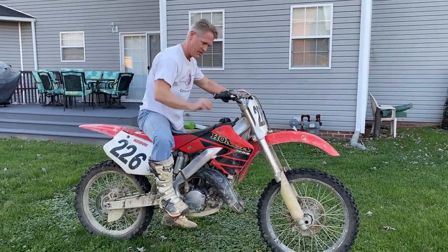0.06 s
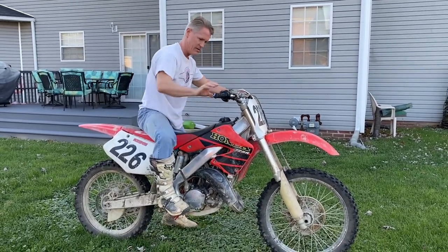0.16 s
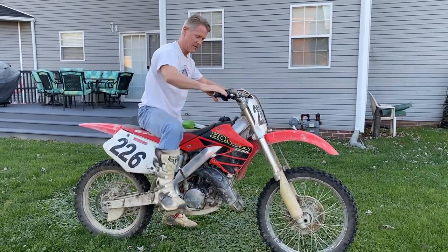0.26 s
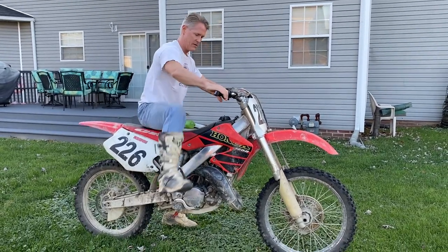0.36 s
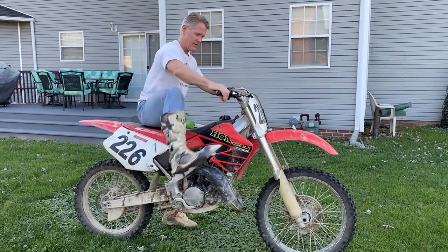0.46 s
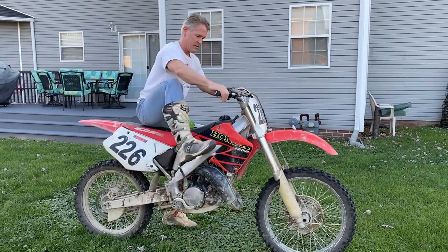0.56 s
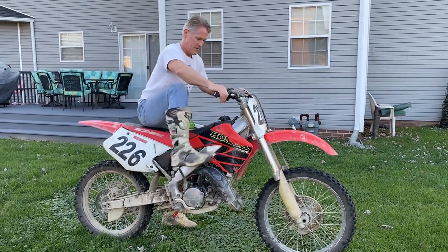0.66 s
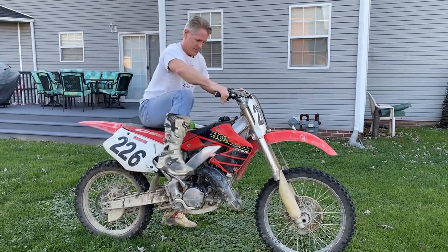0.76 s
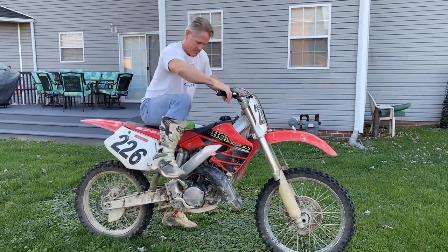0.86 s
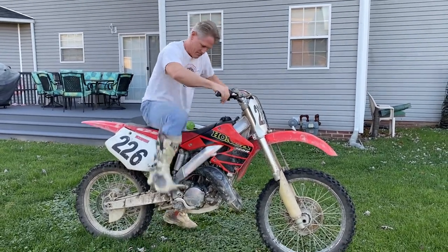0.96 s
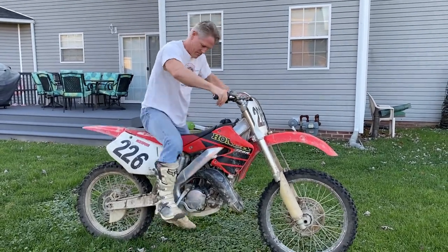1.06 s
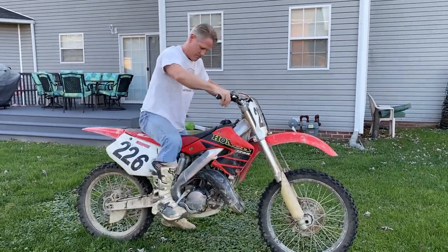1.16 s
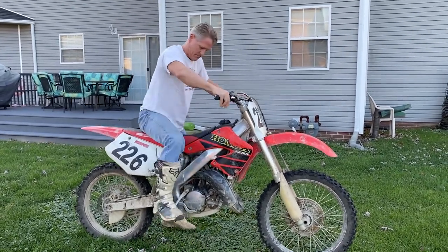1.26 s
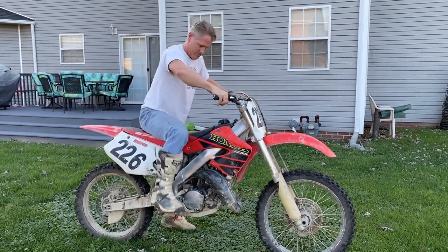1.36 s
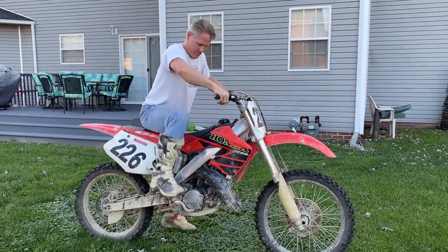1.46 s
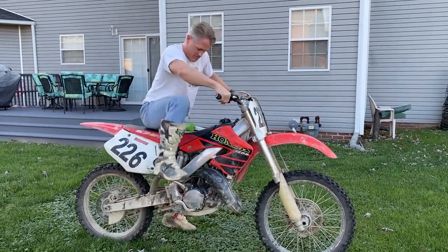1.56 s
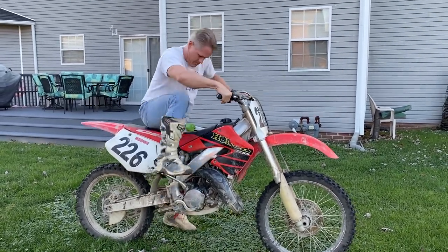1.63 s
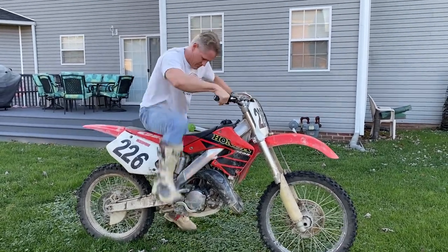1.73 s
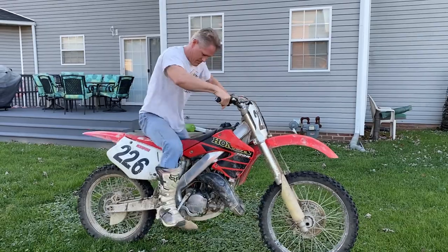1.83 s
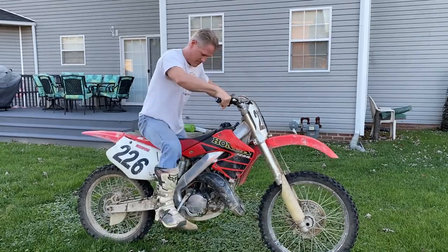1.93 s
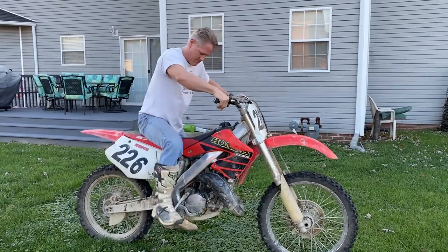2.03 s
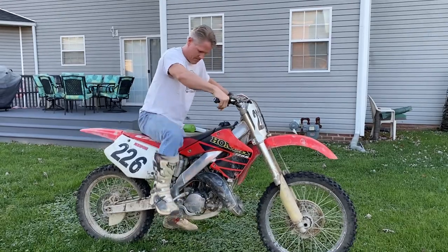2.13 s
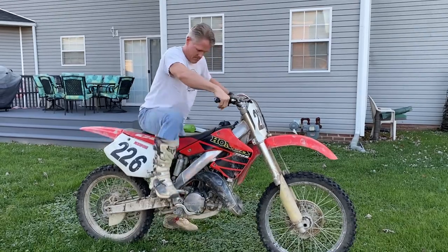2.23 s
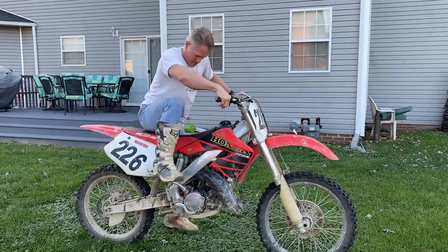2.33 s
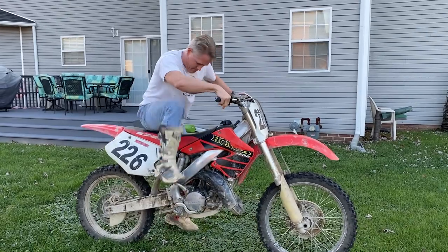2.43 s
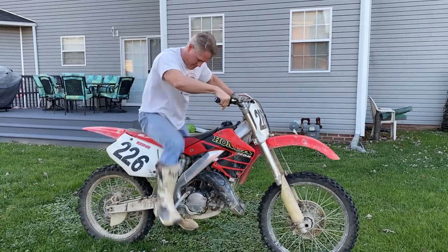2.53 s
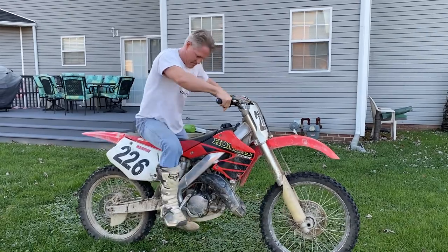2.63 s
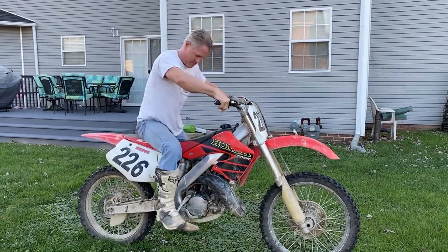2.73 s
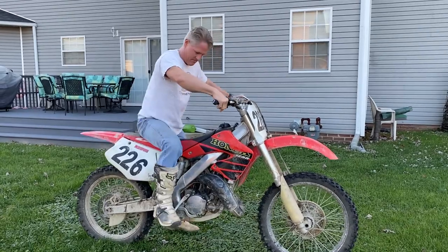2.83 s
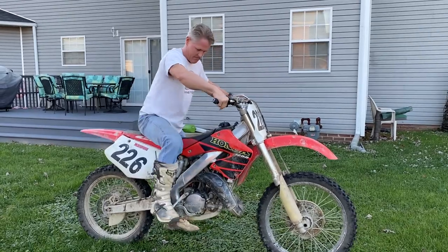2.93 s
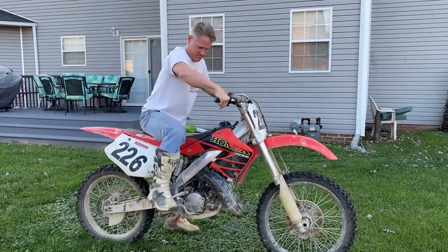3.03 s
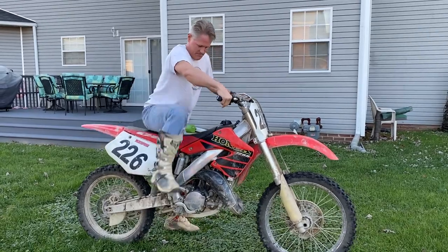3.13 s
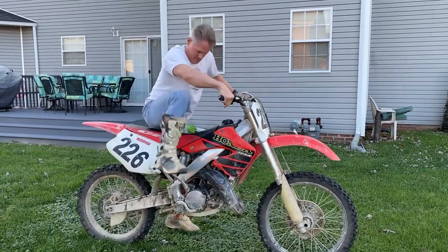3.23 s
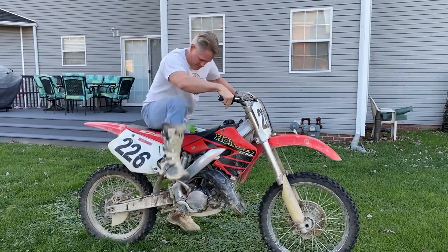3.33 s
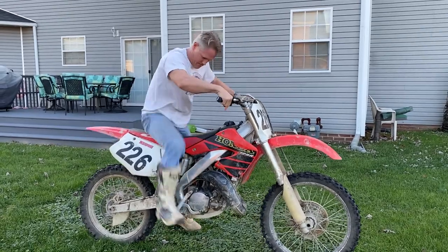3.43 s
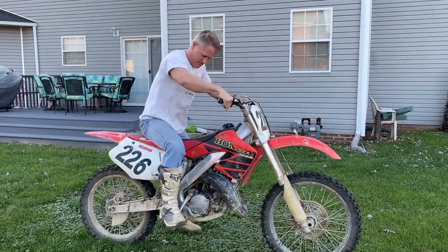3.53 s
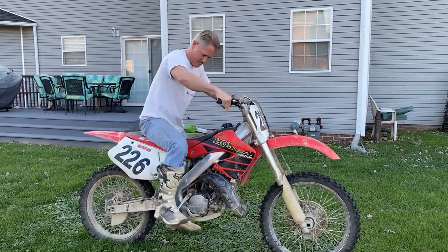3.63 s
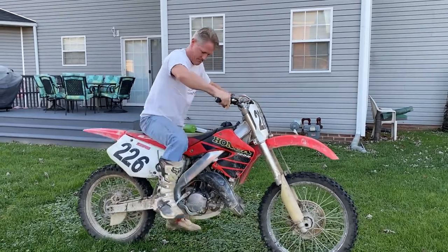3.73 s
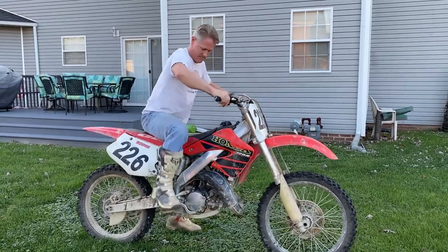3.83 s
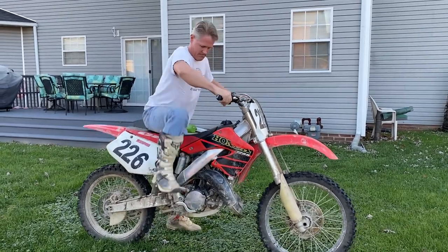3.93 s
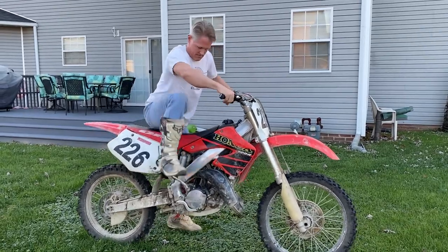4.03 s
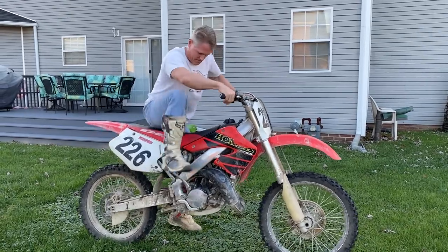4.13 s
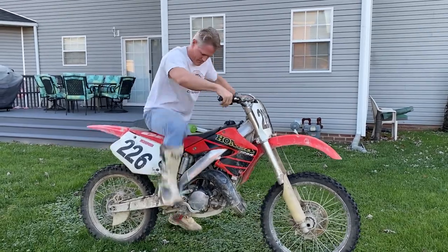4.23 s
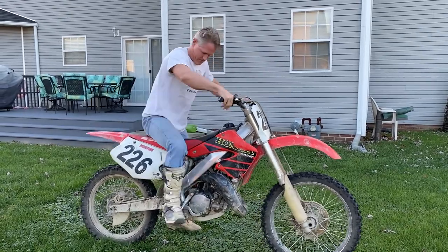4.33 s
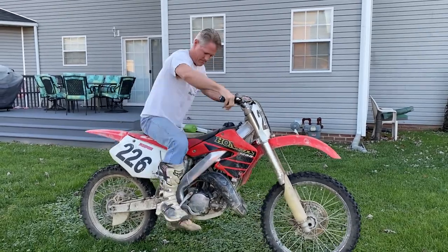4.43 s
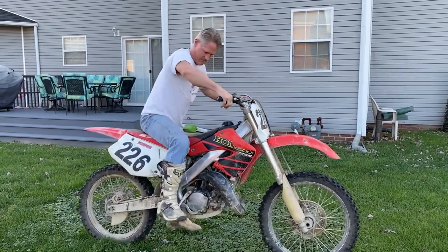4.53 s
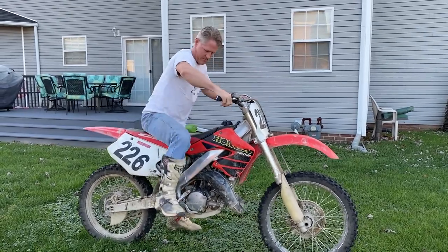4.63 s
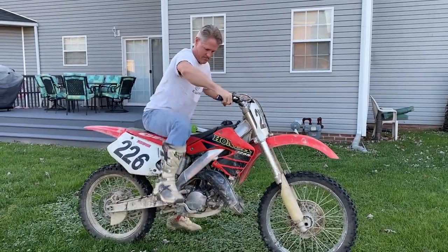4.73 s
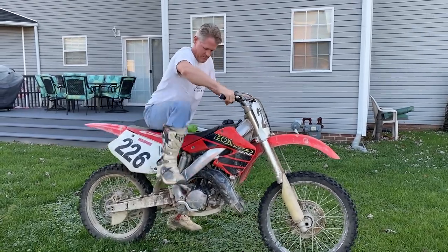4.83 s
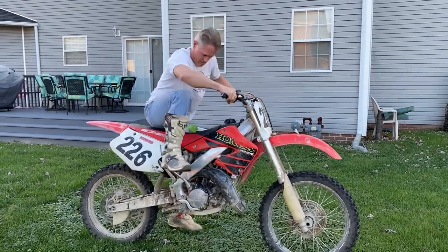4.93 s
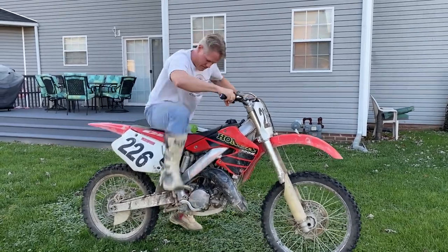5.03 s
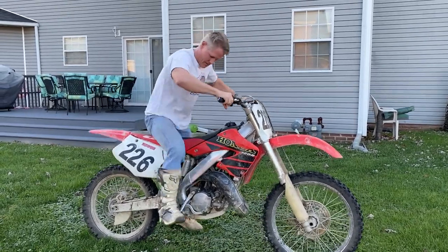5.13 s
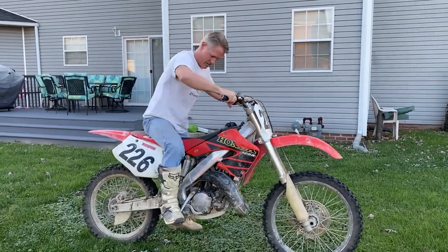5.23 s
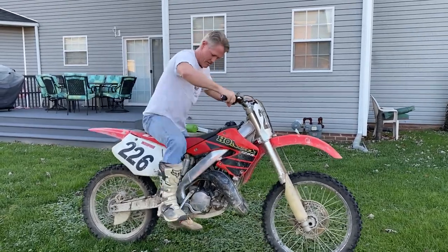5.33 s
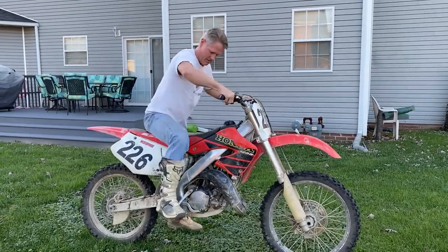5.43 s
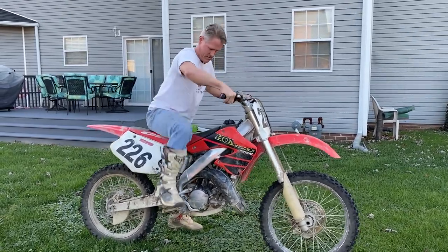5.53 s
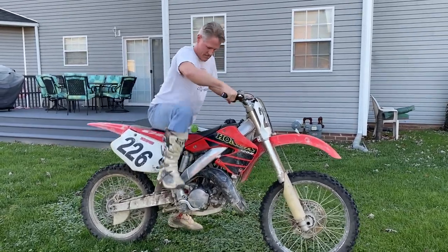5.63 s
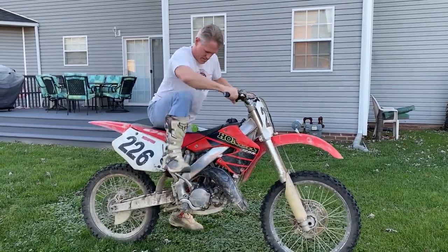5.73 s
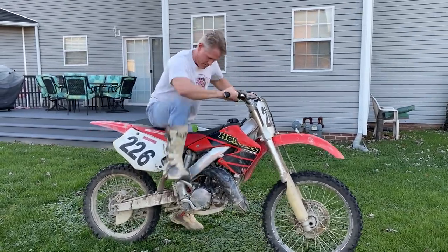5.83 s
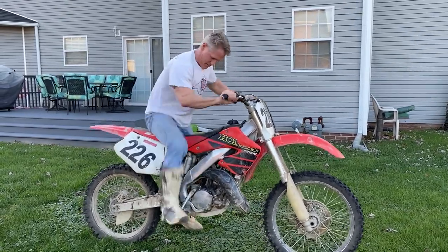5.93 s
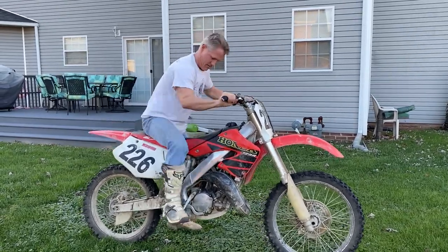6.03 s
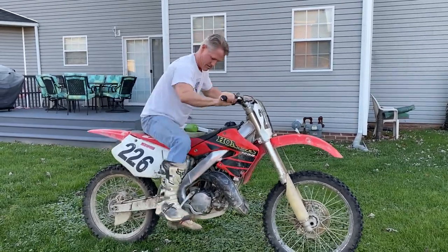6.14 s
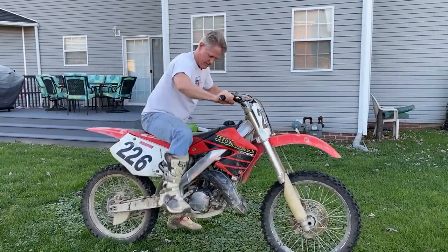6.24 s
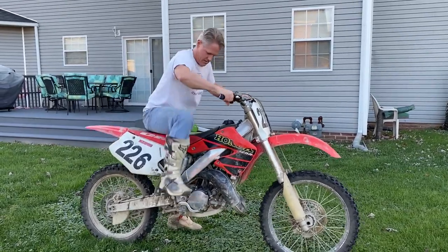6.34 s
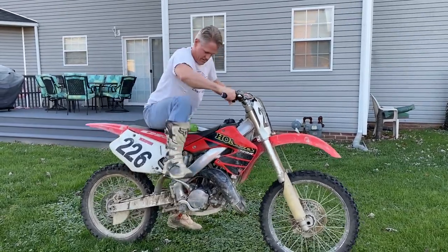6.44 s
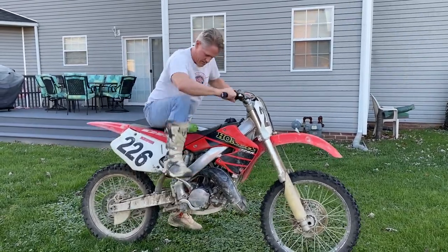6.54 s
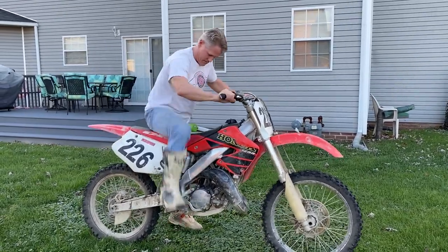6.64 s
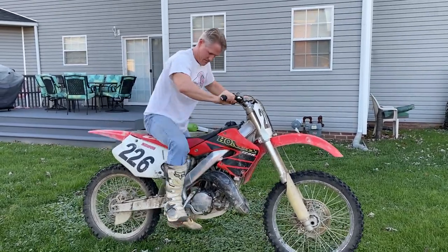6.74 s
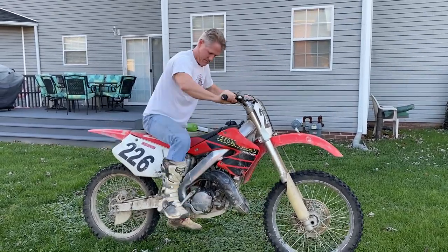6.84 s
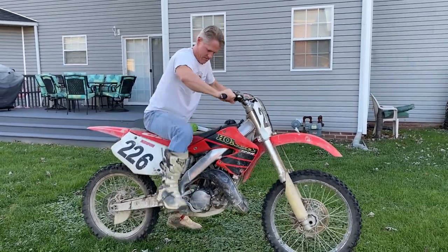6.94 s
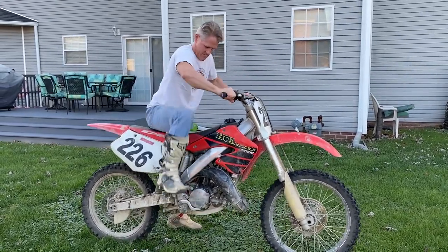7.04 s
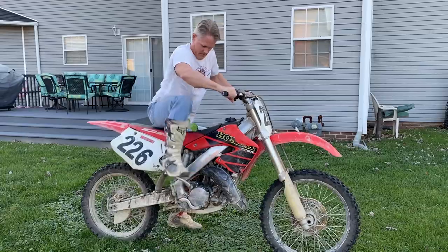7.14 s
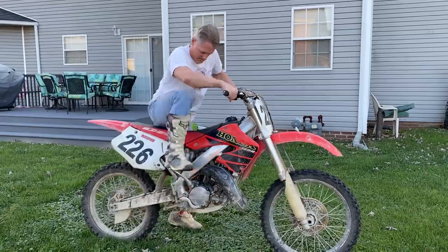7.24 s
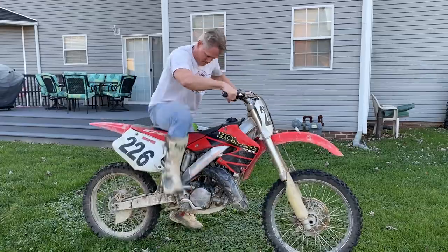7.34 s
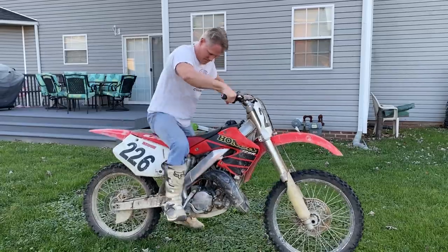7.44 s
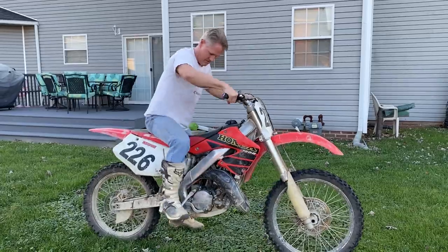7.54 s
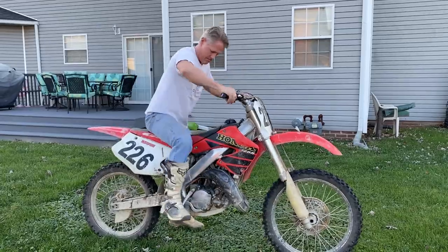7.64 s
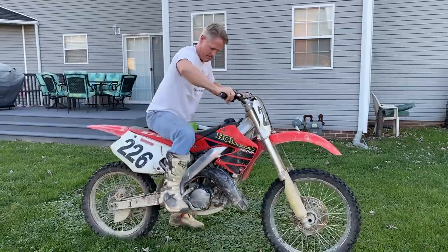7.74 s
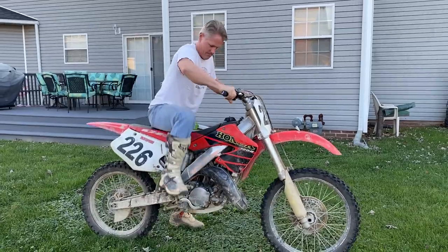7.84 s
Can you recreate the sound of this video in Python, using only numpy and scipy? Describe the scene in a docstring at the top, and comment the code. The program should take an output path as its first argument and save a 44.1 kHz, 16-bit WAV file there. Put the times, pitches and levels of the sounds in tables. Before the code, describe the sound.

Repeated metallic kickstarter slams with gear whir, soft exhaust puffs and ratchet clicks, echoing dully off house walls; the dirt bike fails to start.

```python
"""Distant traffic hums over a lawn in front of a house; then a boot stirs the lever of a two-stroke dirt bike.
Nine kicks follow and it does not start; twice it coughs: weak firings ring the exhaust pipe.
Each kick slams the lever on its stop (struck modes), whirs the gears (shaped noise) and puffs the piston
into the pipe (swelling modes and a hiss); the ratchet ticks as the lever returns.
The house walls answer every hit with delayed dull slaps; a phone with two ports is the microphone."""
import sys
import numpy as np
from scipy import signal
from scipy.fft import rfft, irfft
from scipy.io import wavfile
from scipy.ndimage import uniform_filter1d

SR = 44100
rng = np.random.default_rng(int(sys.argv[2]) if len(sys.argv) > 2 else 0)


def log_audio(samples):
    """Write samples as a 16-bit WAV file to the path given in sys.argv[1]."""
    # one column per channel
    frames = np.atleast_2d(samples).T
    # limit to full scale, then quantise
    limited = np.clip(frames, -1, 1)
    pcm = np.round(limited * 32767).astype(np.int16)
    wavfile.write(sys.argv[1], SR, pcm)


N = 347772
T = np.arange(N) / SR


def undb(db):
    """dB to gain."""
    return 10 ** (np.asarray(db) / 20)


def unit(x):
    """Scale to rms 1."""
    return x / np.sqrt(np.mean(x ** 2))


def read(table, hz):
    """Read a (frequency [Hz], value) table on a log-frequency axis."""
    f, v = np.transpose(table)
    return np.interp(np.log(hz + 1), np.log(f + 1), v)


def coloured(table):
    """Noise of rms 1 with the spectrum of a table."""
    spectrum = rfft(rng.standard_normal(N))
    return unit(irfft(spectrum * undb(read(table, np.fft.rfftfreq(N, 1 / SR))), N))


def walk(rate):
    """Random levels, `rate` new ones a second, slewed from one to the next; rms 1."""
    hold = int(SR / rate)
    steps = np.repeat(rng.standard_normal(N // hold + 1), hold)
    return unit(uniform_filter1d(steps, hold)[:N])


def add(out, s, sound):
    """Lay a sound into the track at s seconds."""
    i = int(s * SR)
    out[i:i + len(sound)] += sound[:N - i]


def swell(arrival_ms, t, sharp):
    """Rise to 1 at the arrival time and fall again; a higher sharp makes it narrower."""
    u = 1000 * t / arrival_ms
    return (u * np.exp(1 - u)) ** sharp


# Far road hum: (frequency [Hz], relative density [dB per Hz])
ROAD_SPECTRUM = [(25, -37.5), (49, 3.5), (147, -4), (220, -17.5), (650, -15), (1600, -31.5), (2150, -29),
                 (2800, -38), (5000, -44.5), (16000, -56.5)]
TRAFFIC_DB = -46


def traffic():
    """Far road hum: coloured noise whose level swells slowly."""
    return undb(TRAFFIC_DB + 1.2 * walk(1.8)) * coloured(ROAD_SPECTRUM)


# Bright crack of metal on metal: (frequency [Hz], relative density [dB per Hz])
CRACK_SPECTRUM = [(2500, 1), (4000, 4), (7000, 2.5), (10500, 3.5), (12500, -0.5), (15500, -1.5)]


def blows(events, modes, crack_ms, sharp, scatter_db, count=5):
    """Each blow swells through crowded mode groups of the struck part, with a short bright crack at its front.

    events: (time [s], peak [dB], crack [dB]); count: modes per group; scatter_db: random colour of each blow.
    """
    out, crack_gate, t = np.zeros(N), np.zeros(N), T[:SR // 20]
    hz, spread, db, arrival = (column[:, None] for column in np.transpose(modes))
    shape = swell(arrival, t, sharp)
    crack = swell(crack_ms, t, 1.4) + 0.19 * swell(2.0 * crack_ms, t, 0.3)
    draws = rng.standard_normal((len(events), 3, count, len(modes), 1))
    for (s, peak_db, crack_db), (colour, detune, phase) in zip(events, draws):
        tones = np.sin(2 * np.pi * (hz + spread * detune) * t + np.pi * phase)
        groups = shape * tones.sum(axis=0)
        groups = groups / np.abs(groups).max(axis=1, keepdims=True)
        ring = (undb(db + scatter_db * colour[0]) * groups).sum(axis=0)
        add(out, s, undb(peak_db) * ring / np.abs(ring).max())
        add(crack_gate, s, undb(crack_db) * crack)
    return out + crack_gate * coloured(CRACK_SPECTRUM)


# Crowded mode groups of the engine case: (frequency [Hz], spread [Hz], level [dB], arrival [ms])
CASE_GROUPS = [(954, 172, 2.5, 4.1), (1257, 208.3, 0, 4.94), (2185, 222, 2.5, 3.53),
               (2936, 320, -1.5, 5.06), (3592, 490, -8.5, 4.1), (4688, 430, -9, 3.2), (602, 129.3, -5.5, 6)]
CASE_SCATTER_DB = 2.0  # each blow colours the groups a little differently
# Boot on the lever, gear knocks loud and faint, and a bright ratchet click:
# (time [s], peak level [dB], treble crack level [dB])
KNOCK_TIMES = [(0.25, -47.5, -68), (0.3, -43, -50), (0.319, -41, -52), (0.707, -31.5, -54),
               (0.718, -15.5, -46.5), (0.751, -32, -58), (0.765, -42, -51), (0.85, -45, -64),
               (1.111, -32, -25), (1.127, -31, -28.5), (1.226, -25, -73), (1.379, -30, -48.5),
               (1.651, -27, -42), (1.669, -28, -53.5), (1.699, -31, -53.5), (1.914, -42, -39),
               (1.939, -27, -34), (1.969, -22, -38.5), (2.014, -25, -40.5), (2.451, -16, -40.5),
               (2.467, -19, -38), (2.673, -28, -30), (2.694, -27, -32.5), (2.72, -20.5, -33),
               (2.735, -23, -48), (3.272, -29.5, -30.5), (3.332, -28.5, -51), (3.349, -19.5, -44),
               (3.366, -17.5, -39), (3.579, -41, -26.5), (3.593, -23.5, -29.5), (3.655, -23, -42),
               (4.172, -24, -68), (4.185, -17.5, -42.5), (4.198, -28, -51.5), (4.229, -40, -39),
               (4.298, -26, -30), (4.378, -37, -34), (4.43, -30, -53), (4.474, -23.5, -49.5),
               (5.003, -24, -54), (5.046, -9, -34), (5.236, -28, -30.5), (5.282, -22.5, -43),
               (5.394, -17, -39.5), (5.851, -15, -42), (5.96, -20, -36), (6.041, -22, -31),
               (6.064, -43, -38), (6.53, -24.5, -49), (6.764, -15, -24), (6.788, -38.5, -30),
               (6.823, -19.5, -58), (7.255, -31, -51), (7.285, -25, -51), (7.308, -19, -44),
               (7.419, -19.5, -32.5), (7.463, -21, -28), (7.48, -32, -23), (7.497, -20, -32),
               (7.55, -18.5, -57), (7.677, -18, -38.5)]


def knocks():
    """Boot, gear teeth and a ratchet click set the crowded modes of the case ringing."""
    return blows(KNOCK_TIMES, CASE_GROUPS, 1.06, 1.55, CASE_SCATTER_DB, count=9)


# Slaps at the bike's place, from deck and house walls, then a far house: (delay [s], level [dB])
WALL_SLAPS = [(.021, -18.5), (.03, -11.5), (0.052, -23), (.176, -26.5)]
YARD_T60_S, YARD_DB, WALL_HZ = 0.56, -15, 3000  # tail decay, tail level, treble limit of the walls
LAWN_DIP_HZ, LAWN_DIP_WIDTH_HZ = 700, 1150  # the bounce off the grass cancels part of each echo
SIDING_HZ, SIDING_WIDTH_HZ, SIDING_DB = 266, 26, 10  # the wall panels boom


def yard(x):
    """Dull, smeared slaps from the house walls and a diffuse tail from the neighbourhood."""
    t = T[:SR]
    room = rng.standard_normal(SR) * np.exp(-np.log(1000) * t / YARD_T60_S) * (t > .02)
    room *= undb(YARD_DB) / np.sqrt(np.sum(room ** 2))
    for delay, db in WALL_SLAPS:
        smeared = np.r_[1, .07 * rng.standard_normal(60)]
        add(room, delay, undb(db) * smeared)
    wet = signal.lfilter(*signal.butter(2, WALL_HZ, fs=SR), signal.fftconvolve(x, room)[:N])
    lawn = signal.iirpeak(LAWN_DIP_HZ, LAWN_DIP_HZ / LAWN_DIP_WIDTH_HZ, fs=SR)
    wet = wet - 0.74 * signal.lfilter(*lawn, wet)
    siding = signal.iirpeak(SIDING_HZ, SIDING_HZ / SIDING_WIDTH_HZ, fs=SR)
    return wet + undb(SIDING_DB) * signal.lfilter(*siding, wet)


# One row per kick; the puff runs of the last two kicks stand in each other's row:
# (lever hits its stop [s], peak level [dB], treble crack level [dB],
# run-up length [ratio to the usual], whir offset at its start [dB],
# first puff of a run [s], its peak level [dB], first crank turn [s])
KICK_ROWS = [(1.073, 2.5, -12, .6, -4.5, 1.03, -19, 0.098), (1.824, 4, -11, 1.2, -7, 1.785, -17.5, 0.071),
             (2.595, 0.5, -10.5, 1.08, 0, 2.545, -16, 0.072), (3.487, 2, -8.5, 1.03, 0, 3.44, -12.5, .066),
             (4.316, 2, -10.5, 1.08, 0, 4.286, -19, 0.077), (5.15, 0.5, -8.5, .8, 0.5, 5.118, -19, 0.082),
             (5.981, 0.5, -13.5, 1.0, 0, 5.944, -22, .088), (6.713, -1.5, -12.5, .7, -5, 7.2, -24.5, 0.085),
             (7.437, 0, -9.5, 1.0, -3, 6.8, -16, 0.065)]
# Gear whir around each slam: (time from the slam [s], relative level [dB])
WHIR_CURVE = [(-.14, -63.5), (-.13, -48.5), (-.03, -37), (0.028, -31.5), (0.098, -37.5), (.2, -53),
              (.3, -78.5)]
# Whir of the gear teeth: (frequency [Hz], relative density [dB per Hz])
GEAR_SPECTRUM = [(200, -1.5), (500, -7.5), (750, -8.5), (1240, -0.5), (1650, -14.5), (2130, -1.5),
                 (2670, -14), (3340, -10), (7000, -31), (11000, -33.5), (16000, -44.5)]
# Crankcase rumble under load: (frequency [Hz], relative density [dB per Hz])
GRIND_SPECTRUM = [(90, -1.5), (200, -0.5), (550, 2.5), (1100, -5.5), (2500, -29)]
GRIND_DB, GRIND_LEAD_S = 2.5, 0.034  # over the whir curve; ahead of it
ENGAGED_DB = -56  # whir curve level above which the lever drives the crank
RATTLE_DB = 11  # loose gear teeth over the whir curve
RUSTLE_START_S, RUSTLE_DB = .72, -56.5


def gears(count=300):
    """Gear teeth whir and rattle while the crank turns; boot and lever rustle faintly between kicks."""
    lag, db = np.transpose(WHIR_CURVE)
    turning = np.zeros(N)
    for slam_s, _, _, run_up, start_db, *_ in KICK_ROWS:
        stretched = np.where(lag < 0, lag * run_up, lag)
        level_db = db + start_db * (lag < -.1)
        turning += undb(np.interp(T - slam_s, stretched, level_db, -150, -150))
    rustle = undb(RUSTLE_DB + 4.77 * walk(7.9)) * (T > RUSTLE_START_S)

    # teeth knock at random moments, most often once the crank runs free
    share = np.cumsum(np.sqrt(np.roll(turning, int(.035 * SR))))
    when, size = rng.random((count, 2)).T
    at = np.searchsorted(share, when * share[-1])
    knock_db = 20 * np.log10(turning[at]) + RATTLE_DB + 10.0 * np.log(size + 1e-3)
    rattle_events = np.transpose([T[at], knock_db, knock_db - 14.5])
    rattle = blows(rattle_events, CASE_GROUPS, 0.85, 9.4, CASE_SCATTER_DB, count=4)

    # the load is highest on the way down, ahead of the top speed
    load = np.roll(turning, -int(GRIND_LEAD_S * SR)) * (turning > undb(ENGAGED_DB))
    grind = coloured(GRIND_SPECTRUM) * load * undb(GRIND_DB + 4.2 * walk(45))

    flicker = undb(5.5 * walk(60) + 2.3 * walk(500))
    whir = coloured(GEAR_SPECTRUM) * (undb(-6.5) * turning + rustle) * flicker
    return rattle + grind + whir


TURN_SLOWS, TURN_FADE_DB = 1.1, -4.5  # each crank turn is longer and its puff weaker than the one before


def puff_rows(count=4):
    """The piston pushes unburnt air out once a turn while the crank slows: (time [s], peak level [dB]) rows."""
    k = np.arange(count)
    turns = np.cumsum(TURN_SLOWS ** k) - TURN_SLOWS ** k
    rows = []
    for *_, first_s, db, turn_s in KICK_ROWS:
        rows += zip(first_s + turn_s * turns, db + TURN_FADE_DB * k)
    return rows


HISS_HZ, HISS_DB, HISS_LEAD_S, HISS_MS = 4000, -29.5, 0.026, 22.6  # level is relative to the puff


def hiss():
    """Air squeezed past the piston ahead of each puff: a soft swell of bright noise once a turn."""
    gate = np.zeros(N)
    for s, db in puff_rows():
        add(gate, s - HISS_LEAD_S, undb(db + HISS_DB) * swell(HISS_MS, T[:SR // 8], 3.1))
    bright = signal.lfilter(*signal.butter(1, HISS_HZ, "high", fs=SR), rng.standard_normal(N))
    return gate * undb(3.0 * walk(150)) * bright


def pipe(events, modes, detune, sharp):
    """A gas push runs down the expansion pipe and leaves it as a thump; each pipe mode swells in its own time."""
    out, t = np.zeros(N), T[:SR // 6]
    aligned_s = modes[1][2] / 1000  # all modes are in phase when the second one arrives
    for (s, peak_db), bend in zip(events, 1 + detune * rng.standard_normal(len(events))):
        ring = np.zeros(len(t))
        for hz, db, arrival_ms in modes:
            tone = np.cos(2 * np.pi * hz * bend * (t - aligned_s))
            ring += undb(db) * swell(arrival_ms, t, sharp) * tone
        add(out, s, undb(peak_db) * ring / np.abs(ring).max())
    return out


# Pipe modes under a push of unburnt air: (frequency [Hz], level [dB], arrival [ms])
PUFF_PIPE = [(77.9, -12.5, 36), (109, -7.5, 13.38), (168, -11, 12), (309.6, -12.5, 2)]


def puffs():
    """Unburnt air thumps softly through the pipe, its highest mode first and its lowest last."""
    return pipe(puff_rows(), PUFF_PIPE, 0.092, 3.1)


# Crowded mode groups of lever and stop, each swelling at its own arrival time:
# (frequency [Hz], spread [Hz], level [dB], arrival [ms])
STOP_GROUPS = [(749, 33.7, -1, 6.1), (1315, 300, -10, 9.2), (2092, 133.7, 1.5, 3.61), (3300, 260, -4, 6.8),
               (4100, 550, -15, 1), (116.6, 24, -12, 12.1), (430, 65, -12, 4.8), (1015, 110, -7.5, 4.2)]


def slams():
    """The lever slams on its stop and its crowded modes ring."""
    return blows([kick[:3] for kick in KICK_ROWS], STOP_GROUPS, 2.0, 2.7, 0.68, count=9)


# The lever climbs back over the ratchet: (peak level [dB], treble crack level [dB], list of tooth times [s]);
# a tooth timed past the end is silent
RETURN_ROWS = [(-25, -51.5, [1.359, 1.419, 1.468, 1.517, 1.577]),
               (-29.5, -43, [2.171, 2.226, 2.281, 2.341, 2.4]),
               (-31.5, -47.5, [3.058, 3.114, 3.167, 3.215]),
               (-26, -47, [3.813, 3.856, 3.916, 3.967, 4.029, 4.087]),
               (-31.5, -42, [4.722, 4.778, 4.82, 4.876, 4.93, 4.975]),
               (-26, -40, [5.552, 5.608, 5.654, 5.704, 5.764]), (-26.5, -44, [6.317, 6.36, 6.397, 6.444]),
               (-28.5, -39, [6.985, 7.046, 7.089, 7.147, 7.22]), (-22.5, -37, [10, 7.869])]
# First to last tooth of a return: (peak offset [dB], crack offset [dB])
TOOTH_OFFSETS = [(0, -2), (1, 3), (0.5, 3.5), (-4, -2), (-4, -4), (-3.5, -9)]


def ratchet():
    """The ratchet clicks over its teeth as the lever returns, each click ringing the case."""
    clicks = []
    for peak_db, crack_db, times in RETURN_ROWS:
        for s, (peak_step, crack_step) in zip(times, TOOTH_OFFSETS):
            clicks.append((s, peak_db + peak_step, crack_db + crack_step))
    return blows(clicks, CASE_GROUPS, 1.19, 2.0, CASE_SCATTER_DB, count=9)


# Weak firings that cough through the pipe: (time [s], peak level [dB])
COUGH_TIMES = [(5.942, 2.5), (6.0232, -2), (6.6655, 3), (6.748, -1)]
# Pipe modes under a firing: (frequency [Hz], level [dB], arrival [ms])
COUGH_PIPE = [(145, 0, 7.4), (268, 4.5, 5.5), (372, 0, 7.5), (664, -2, 3.8)]


def coughs():
    """Weak firings push gas through the pipe."""
    return pipe(COUGH_TIMES, COUGH_PIPE, 0.019, 3.55)


# Phase between the phone's ports: (frequency [Hz], left lead [rad])
PORT_LEAD = [(0, .1), (700, .38), (1300, .5), (2070, .2), (3190, 1.8), (4050, .6), (5340, 1.6), (6370, .9),
             (8530, -2.5), (10800, -5.9), (13600, -9.7), (14900, -12.2), (16000, -12.7)]
# Balance between the phone's ports: (frequency [Hz], left minus right [dB])
PORT_LEVELS = [(60, -2), (600, 1), (1300, -1), (2400, -3.5), (4400, 6), (8000, 0)]


def two_ports(front, around):
    """The phone body turns phase and balance between its ports; sound from all around differs in sign."""
    hz = np.fft.rfftfreq(N, 1 / SR)
    half = undb(read(PORT_LEVELS, hz) / 2) * np.exp(.5j * np.interp(hz, *np.transpose(PORT_LEAD)))
    left = irfft(rfft(front) * half, N) + around
    right = irfft(rfft(front) / half, N) - around
    return np.array([left, right])


def scene():
    """Bike, walls and road reach both ports; some echo and road also arrive from all around."""
    bike = knocks() + gears() + hiss() + puffs() + slams() + ratchet() + coughs()
    front = bike + yard(bike) + traffic()
    diffuse = undb(-6.5) * yard(bike) + undb(3.5) * traffic()
    around = signal.lfilter(*signal.butter(2, 700, "high", fs=SR), diffuse)
    return two_ports(front, around)


BASS_CUT_HZ, TOP_HZ = 35, 16350


def record(dry):
    """The phone loses the lowest bass, clips the loudest peaks and cuts the top."""
    thin = signal.lfilter(*signal.butter(2, BASS_CUT_HZ, "high", fs=SR), dry)
    top_cut = signal.ellip(8, .2, 60, TOP_HZ, fs=SR, output="sos")
    return signal.sosfilt(top_cut, np.clip(thin, -.97, .97))


dry = scene()
out = record(dry)
log_audio(out)
```